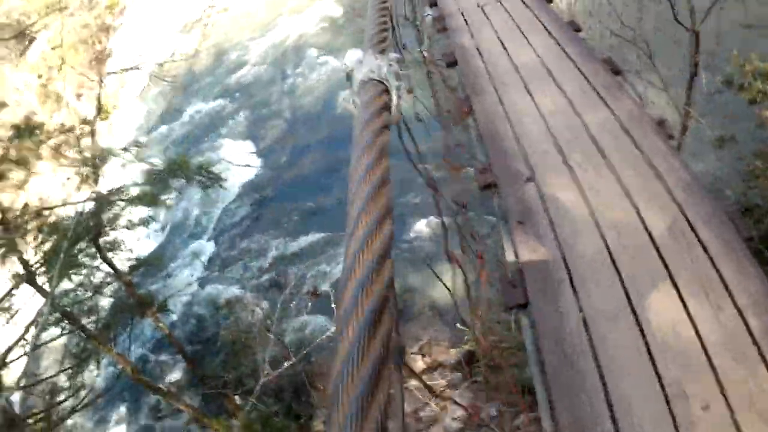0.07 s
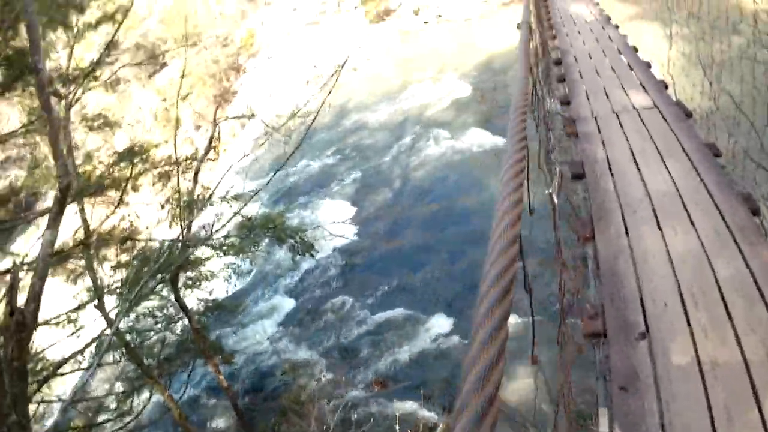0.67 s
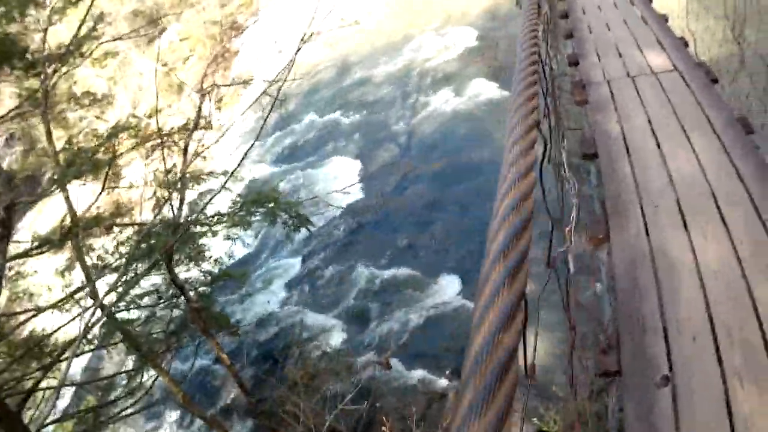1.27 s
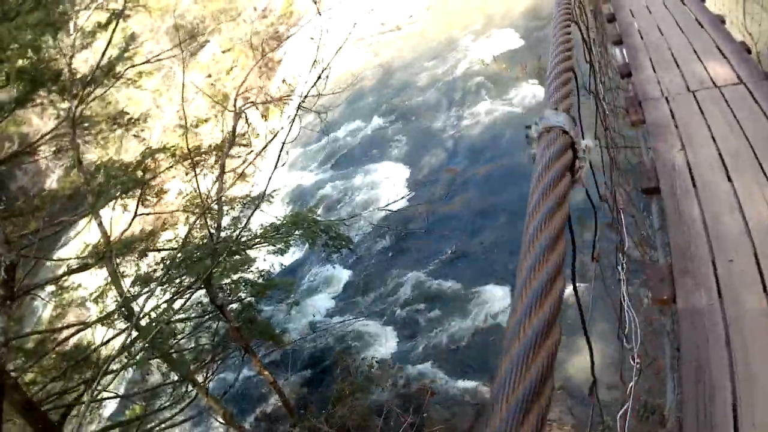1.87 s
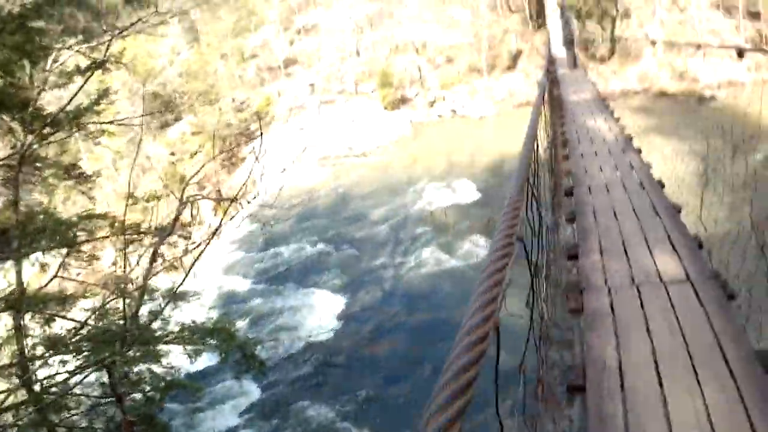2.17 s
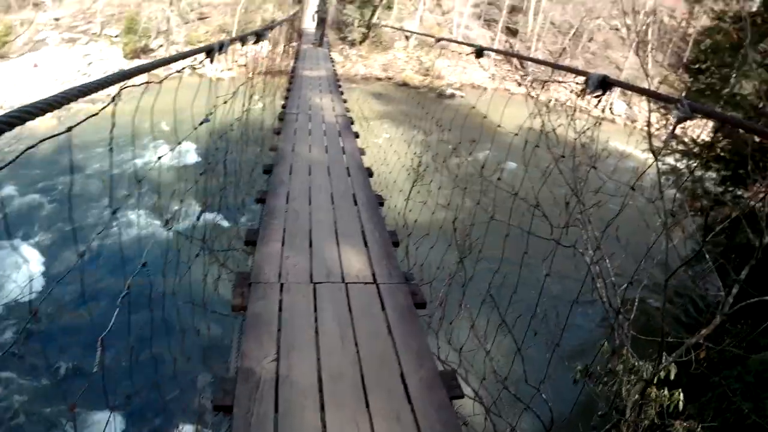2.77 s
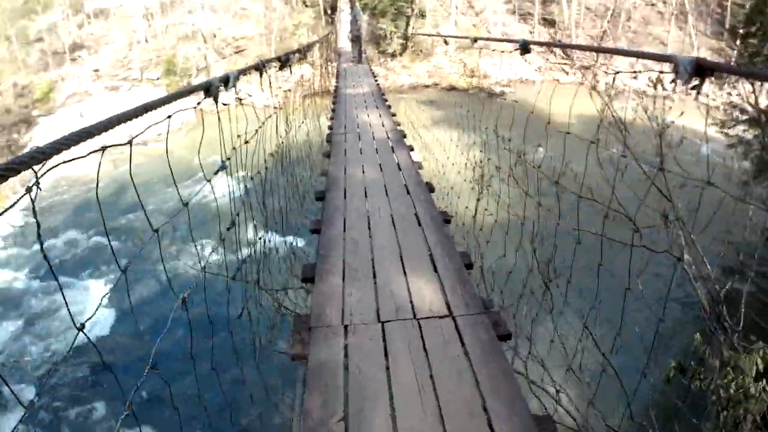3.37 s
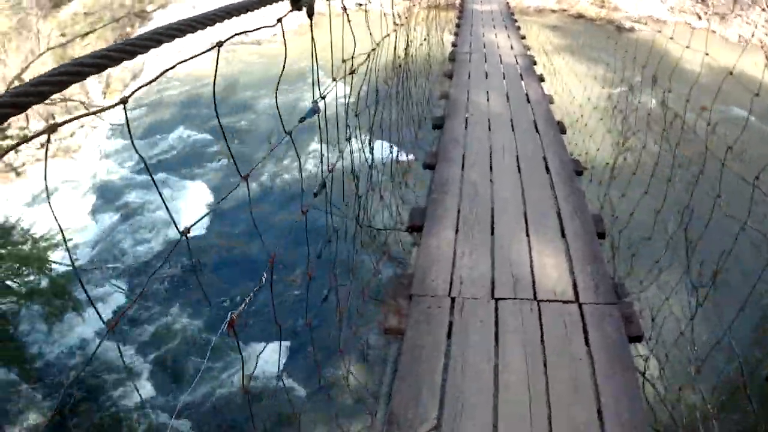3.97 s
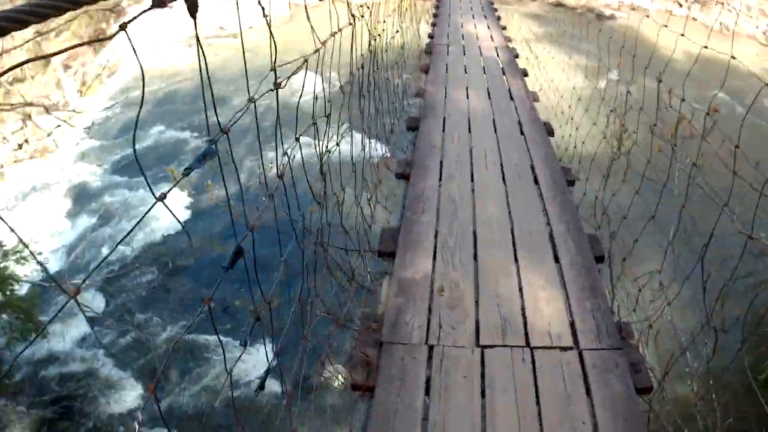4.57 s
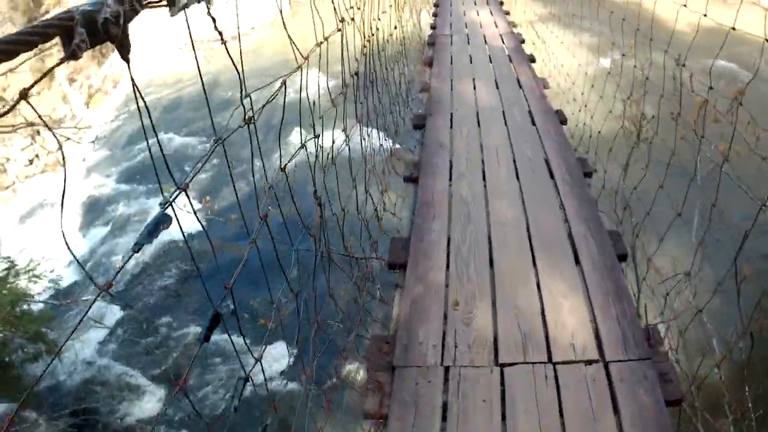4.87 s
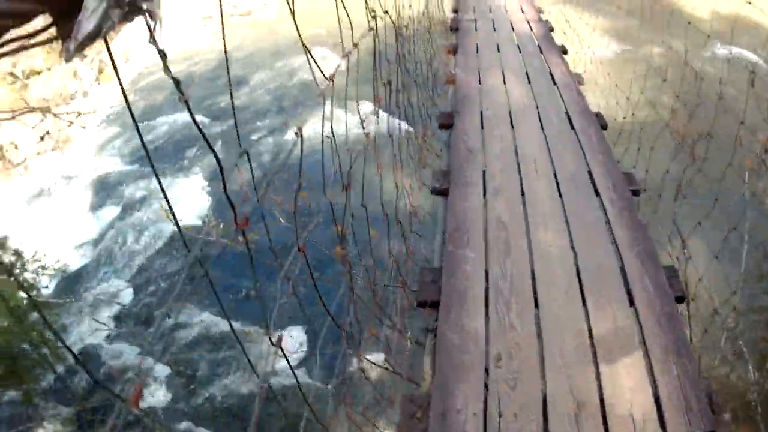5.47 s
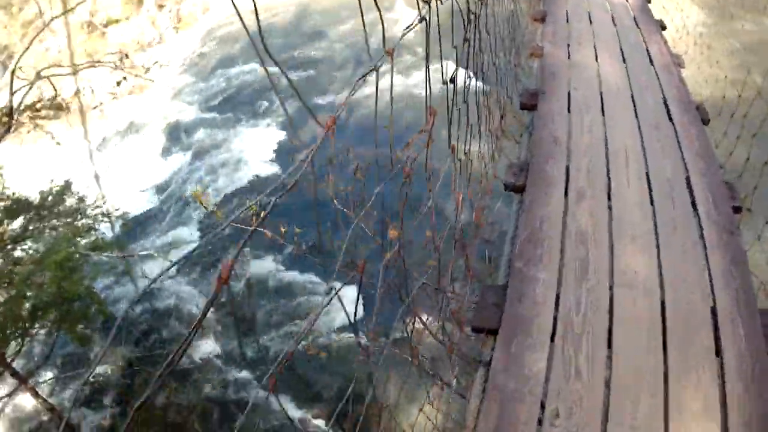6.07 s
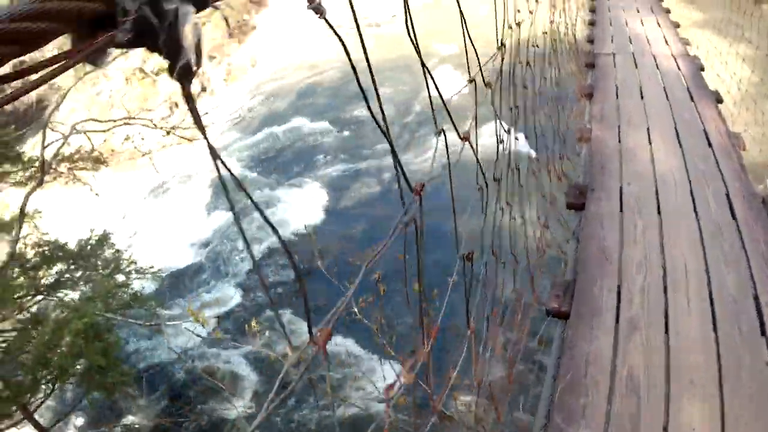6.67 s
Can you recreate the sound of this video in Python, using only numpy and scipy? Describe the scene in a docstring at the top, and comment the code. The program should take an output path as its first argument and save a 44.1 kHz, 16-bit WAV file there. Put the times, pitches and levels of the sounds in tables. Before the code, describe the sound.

At the very start, fingers hit a hand-held camera right at the microphone: a tight cluster of hard knocks, heard almost as one, that overloads it and dies away quickly. Far quieter, a fast river washes and bubbles below a suspension footbridge throughout, sounding narrow and nasal through the small microphone. Air rumbles on the microphone, with low fluttering gusts at about 1 and 1.4 seconds and faint taps near 1 and 1.8 seconds. Around 2.3 seconds the grip shifts with a softer double knock and dull bumps, followed by small bumps near 2.7 and 3.2 seconds. A weaker gust passes at 3.5 seconds and the wind settles. From about 4 seconds the rush is slightly duller and quieter. One faint tick comes near 5.8 seconds, and the water runs on to the end at about 6.6 seconds.

```python
"""Fingers knock hard on a hand-held camera, right at the microphone, and overload it over a river's rush.
We are on a suspension footbridge, with fast water washing and bubbling below; the small microphone
sounds narrow and nasal. Softer knocks and bumps of the grip follow, moving air rumbles on the
microphone, and the rush dulls a little as the camera turns from the rapids."""
import sys
import numpy as np
from scipy import signal
from scipy.fft import rfft, irfft
from scipy.io import wavfile
from scipy.ndimage import uniform_filter1d

SR = 44100
rng = np.random.default_rng(int(sys.argv[2]) if len(sys.argv) > 2 else 0)


def wav_record(signal):
    """Record a signal, one row per channel, as 16-bit PCM in the file named by sys.argv[1]."""
    frames = np.transpose(np.atleast_2d(signal))
    bounded = np.clip(frames, -1, 1)
    # unit amplitude maps onto the largest positive 16-bit level
    quanta = np.round(bounded * 32767).astype(np.int16)
    wavfile.write(sys.argv[1], SR, quanta)


N = 295911


def gain_of(db):
    """Decibels to amplitude."""
    return 10 ** (np.asarray(db) / 20)


def unit_rms(x):
    """Scales to rms 1."""
    return x / np.sqrt(np.mean(x ** 2) + 1e-20)


def spectrum_db(points, hz):
    """Interpolates a spectrum on a log-frequency axis."""
    point_hz, db = np.transpose(points)
    return np.interp(np.log(hz + 1), np.log(point_hz + 1), db)


def add(mix, start_s, sound):
    """Lays a sound into the mix."""
    part = mix[max(round(start_s * SR), 0):][:len(sound)]
    part += sound[:len(part)]


def finger_knocks(scuff_db=-4.0, scuff_t60=0.038, snap_db=-0.5, snap_s=0.00024, snap_delay_s=0.00164):
    """Right at the microphone, a finger lands with a snap, rings the case and scuffs the plastic."""
    # modes of the case: (frequency [Hz], t60 [s], level at strength 0 [dB], growth with strength [dB/dB])
    case_modes = [(172, 0.28, -10.5, 2), (232.8, 0.11, 1, 1), (709, 0.041, -1.5, 1.24),
                  (1426, 0.028, 1, 1.32), (3100, 0.0264, -3, 2.0), (504, 0.057, -16, 1.5)]
    # knocks; where a finger lands sets the pitch it favours:
    # (time [s], strength [dB], favoured pitch [Hz], fall-off [dB/octave])
    blows = [(0.0005, -0.5, 236, 0.5), (0.0056, 3, 640, 7.5), (0.0177, 6, 1680, 12), (0.0292, 4, 720, 8.5),
             (1.046, -39.5, 235, 8), (1.785, -36.5, 1400, 3.5), (2.2688, -21.5, 1300, 1),
             (2.29, -16.5, 240, 2.5), (3.249, -41.5, 240, 3), (5.837, -39, 1420, 13)]
    t, out = np.arange(SR // 2) / SR, np.zeros(N)
    scuff_band = signal.butter(4, [330, 1680], "band", fs=SR, output="sos")
    soft_onset = 1 - np.exp(-(t / 0.0006) ** 2)  # a fingertip is soft
    snap = np.exp(-((t - snap_delay_s) / snap_s) ** 2)
    for start_s, strength_db, favoured_hz, fall_db in blows:
        modes_db = [db + growth * strength_db - fall_db * abs(np.log2(hz / favoured_hz))
                    for hz, _, db, growth in case_modes]
        ring = sum(gain_of(db - 60 * t / t60) * np.sin(2 * np.pi * hz * t)
                   for db, (hz, t60, *_) in zip(modes_db, case_modes))
        scuff = unit_rms(signal.sosfilt(scuff_band, rng.standard_normal(len(t))))
        scuff *= gain_of(np.mean(modes_db[2:4]) + scuff_db - 60 * t / scuff_t60)
        add(out, start_s, soft_onset * (ring + scuff) + gain_of(strength_db + snap_db) * snap)
    return out


def river(gain_db=2, bubbles_db=-15, patch_db=1.01, surge_db=0.35, spray_db=-1.5, spray_growth=0.2):
    """Wash and bubbles churn below the bridge, coloured by the hollow of the microphone port."""
    # the rush of the rapids: (frequency [Hz], relative spectral density [dB])
    rush_spectrum = [(60, 4.5), (200, 0), (550, -5), (850, -7.5), (1100, -7), (1600, -4.5), (2000, -5.5),
                     (2400, -13.5), (2700, -14.5), (3000, -8.5), (3400, -9.5), (3700, -14.5), (4300, -13)]
    # how squarely the microphone faces the rapids: (time [s], relative level [dB])
    facing = [(0.2, -46), (0.85, -46.5), (1.25, -45), (2.0, -47.5), (2.45, -46.5), (2.75, -48),
              (3.55, -47.5), (4.2, -50), (4.45, -48.5), (4.9, -49.5), (5.12, -48.5), (6.25, -49),
              (6.6, -47)]
    port_hz, port_width_hz, port_lift_db = 1303, 201, 12.85
    water = rng.standard_normal(N) + gain_of(bubbles_db) * bubbles()
    hz, t, spectra = signal.stft(water, SR, nperseg=1024, noverlap=768)
    # single waves break: patches of spectrum swell for a moment, and the whole rush surges
    patches = uniform_filter1d(rng.standard_normal(spectra.shape), size=10, axis=0)
    patches = unit_rms(uniform_filter1d(patches, size=12, axis=1))
    surge = unit_rms(uniform_filter1d(rng.standard_normal(len(t)), size=20))
    port_db = port_lift_db / (1 + (2 * (hz - port_hz) / port_width_hz) ** 2)
    colour_db = spectrum_db(rush_spectrum, hz) + port_db
    facing_db = np.interp(t, *np.transpose(facing))
    # spray hiss is more directional than the body of the rush
    hiss_db = spray_db + spray_growth * (facing_db - facing_db.min())
    treble = np.clip((hz - 1800) / 1100, 0, 1)[:, None]
    spectra *= gain_of(colour_db[:, None] + treble * hiss_db + patch_db * patches + surge_db * surge)
    rush = unit_rms(signal.istft(spectra, nperseg=1024, noverlap=768)[1][:N])
    return rush * gain_of(gain_db + np.interp(np.arange(N) / SR, t, facing_db))


def bubbles(per_s=900, pitches=30, spread_db=0.5, decay_cycles=7.35):
    """Bubbles burst down in the white water, each with a short, slightly rising ring."""
    t, out = np.arange(2048) / SR, np.zeros(N)
    for hz in np.geomspace(350, 3800, pitches):
        age = t * hz / decay_cycles
        ring = np.sin(2 * np.pi * hz * t * (1 + 0.027 * age)) * np.exp(-age) * (1 - np.exp(-8 * age))
        strengths = gain_of(spread_db * np.minimum(rng.exponential(1, N), 5))
        bursts = rng.random(N) < per_s / pitches / SR
        out += hz * signal.oaconvolve(strengths * bursts, ring)[:N]
    return unit_rms(out)


def breeze(start_db=-40.5, calm_db=-55.5, calm_from_s=4.6, gust_db=-3.5):
    """Slow eddies press on the microphone, dying down to a calm but pushing harder in the gusts."""
    # rumble of air on the microphone: (frequency [Hz], relative spectral density [dB])
    rumble_spectrum = [(5, 0.5), (18, -2), (32, -6), (55, -14.5), (100, -20.5), (200, -44.5), (500, -43)]
    t = np.arange(N) / SR
    colour = gain_of(spectrum_db(rumble_spectrum, np.fft.rfftfreq(N, 1 / SR)))
    eddies = unit_rms(irfft(rfft(rng.standard_normal(N)) * colour, N))
    easing = gain_of(np.interp(t, [0, calm_from_s], [start_db, calm_db]))
    return eddies * (easing + gain_of(gust_db) * gust_strength(t))


def grip_bumps(leak_hz=4.0, rebound=0.27, lag=3.2, slower=2.3):
    """The grip draws air through the port: pressure dips, leaks away and springs back weaker and slower."""
    # bumps of the hand on the case: (time [s], dip level [dB], half length [s])
    bumps = [(0.027, -8, 0.0023), (2.296, -20, 0.0033), (2.3295, -15.5, 0.0037), (2.358, -26, 0.005),
             (2.707, -30, 0.0043), (3.192, -25.5, 0.0031)]
    t, pressure = np.arange(N) / SR, np.zeros(N)
    for centre_s, db, half_s in bumps:
        offset = (t - centre_s) / half_s
        dip = np.exp(-offset ** 2)
        spring_back = rebound * np.exp(-((offset - lag) / slower) ** 2)
        pressure -= gain_of(db) * (dip - spring_back)
    return signal.sosfilt(signal.butter(1, leak_hz, "high", fs=SR, output="sos"), pressure)


def gust_flutter(flutter_hz=26.5, spread=1.33, flutter_db=-2.0):
    """Each gust sheds eddies round the camera at a fairly even, very low rate."""
    band = signal.butter(2, [flutter_hz / spread, flutter_hz * spread], "band", fs=SR, output="sos")
    eddies = unit_rms(signal.sosfilt(band, rng.standard_normal(N)))
    return eddies * gain_of(flutter_db) * gust_strength(np.arange(N) / SR)


def gust_strength(t):
    """Each gust swells and dies away smoothly."""
    # gusts that buffet the microphone: (peak time [s], relative level [dB], half length [s])
    gusts = [(0.975, -35, 0.063), (1.41, -40, 0.16), (3.51, -45, 0.041), (6.576, -50.5, 0.1)]
    return sum(gain_of(db) * np.exp(-((t - peak_s) / half_s) ** 2 / 2) for peak_s, db, half_s in gusts)


def scene():
    """River, air and handling noise at one microphone on the footbridge."""
    return (river() + breeze() + gust_flutter() + finger_knocks() + grip_bumps())[None]


def record(dry, headroom=0.79, band_hz=3780, skirt_hz=4350, leak_db=-18.0, overload=0.72):
    """The microphone saturates, the recorder keeps a narrow band, and the hardest knocks overload it."""
    def low_pass(x, hz, taps, beta):
        kernel = signal.firwin(taps, hz, window=("kaiser", beta), fs=SR)
        return signal.oaconvolve(x, kernel[None], "same")

    saturated = headroom * np.tanh(dry / headroom)
    narrow = low_pass(saturated, band_hz, taps=801, beta=7)
    skirt = low_pass(saturated, skirt_hz, taps=301, beta=8) - narrow
    clipped = np.clip(narrow + gain_of(leak_db) * skirt, -overload, overload)
    return low_pass(clipped, hz=16000, taps=101, beta=8)


dry = scene()
out = record(dry)
wav_record(out)
```